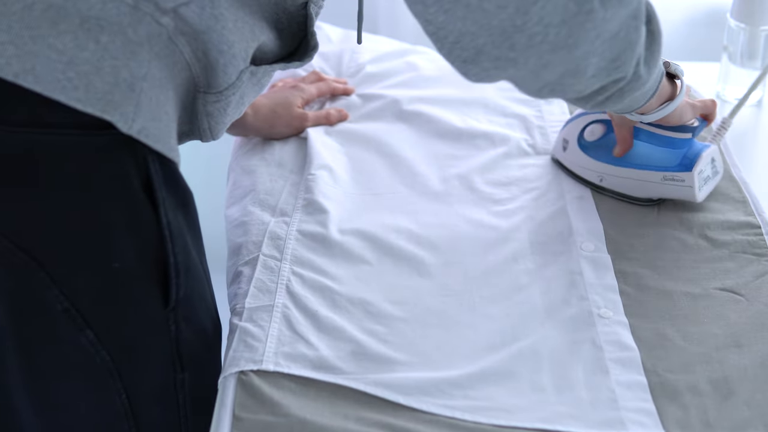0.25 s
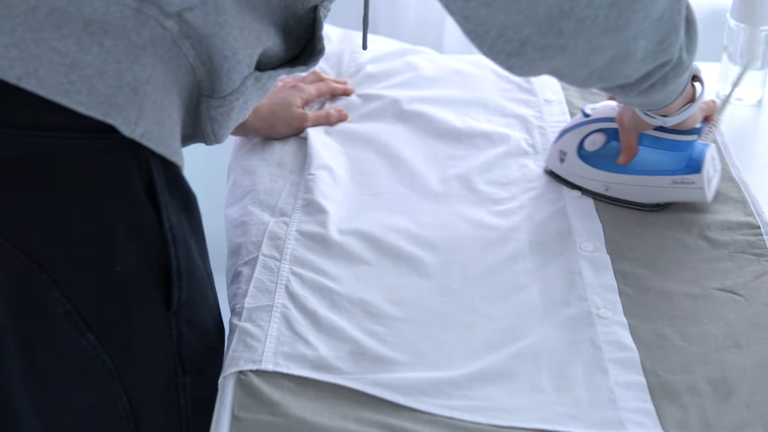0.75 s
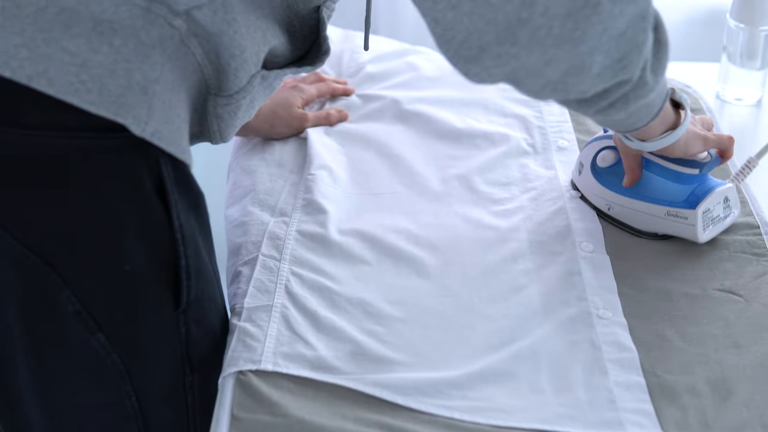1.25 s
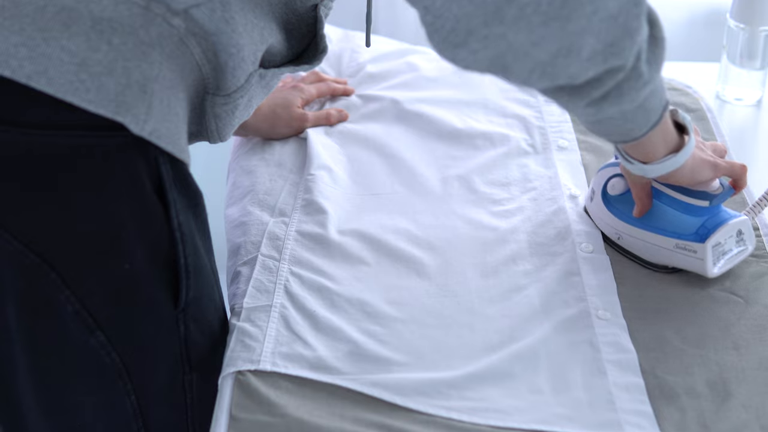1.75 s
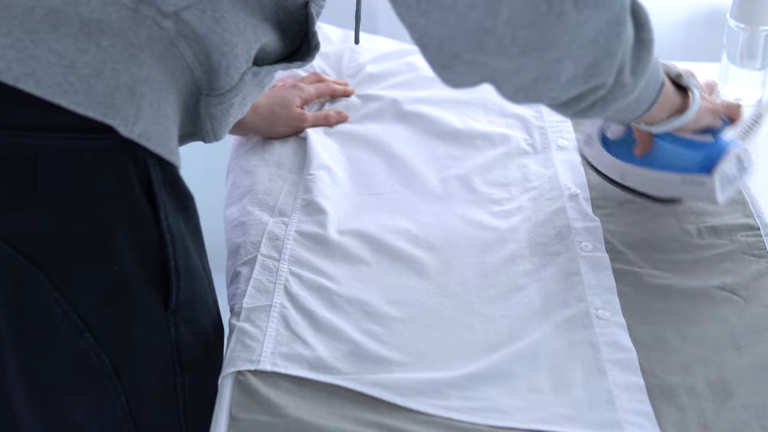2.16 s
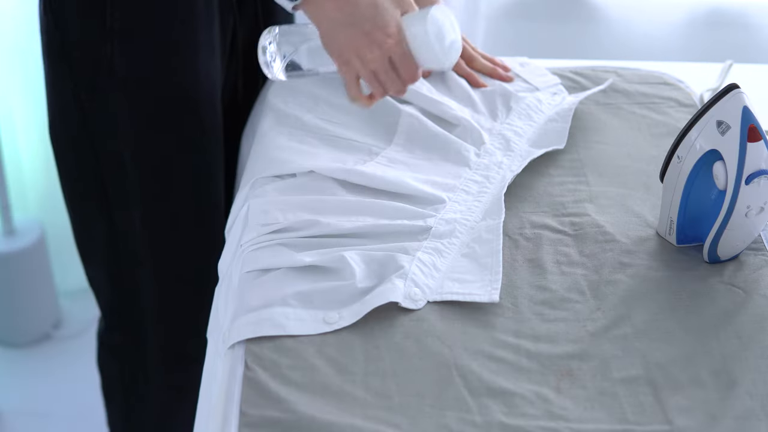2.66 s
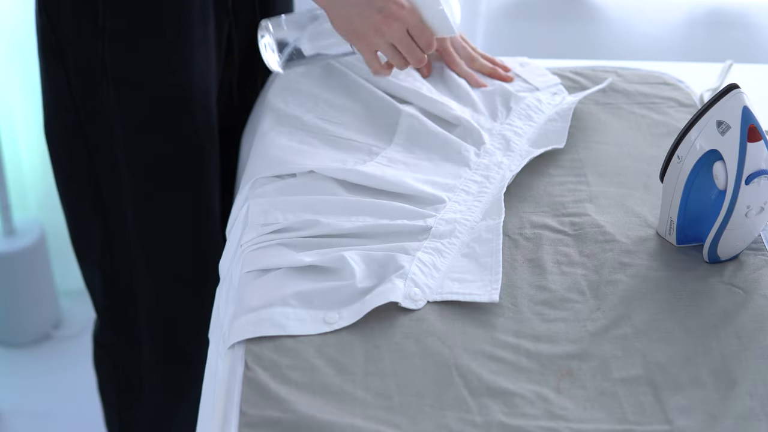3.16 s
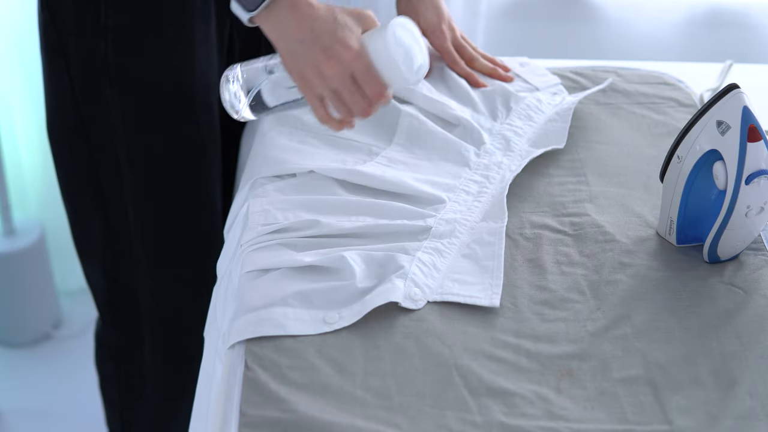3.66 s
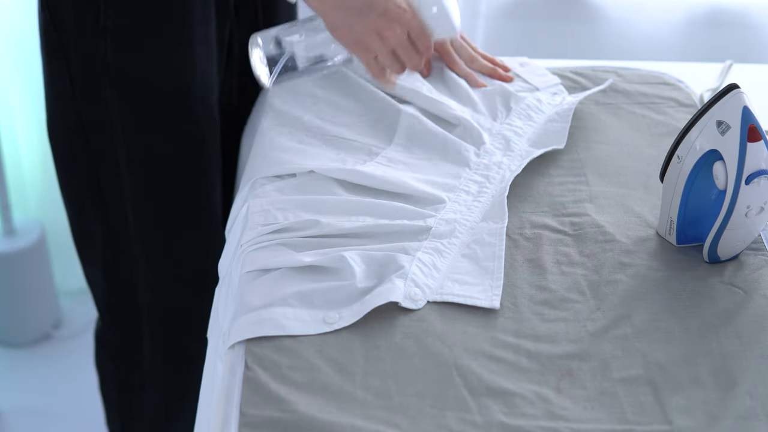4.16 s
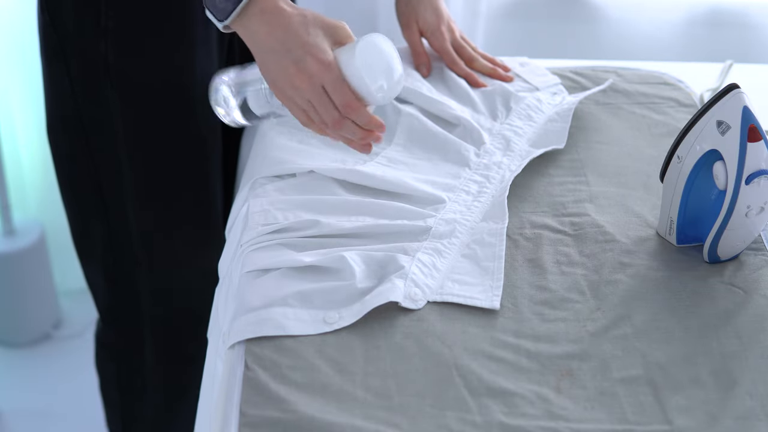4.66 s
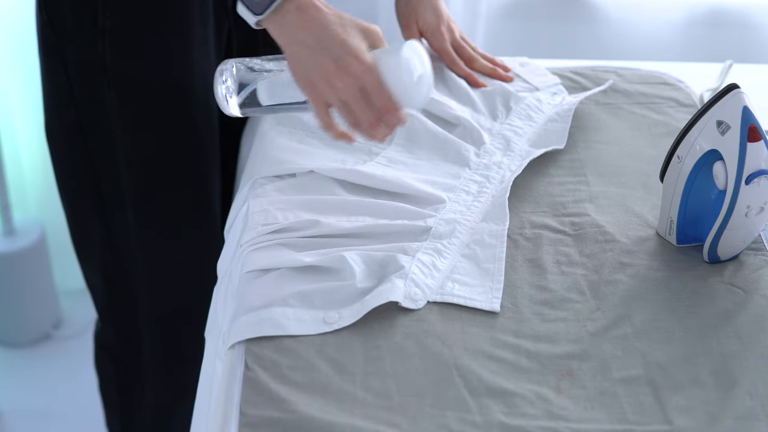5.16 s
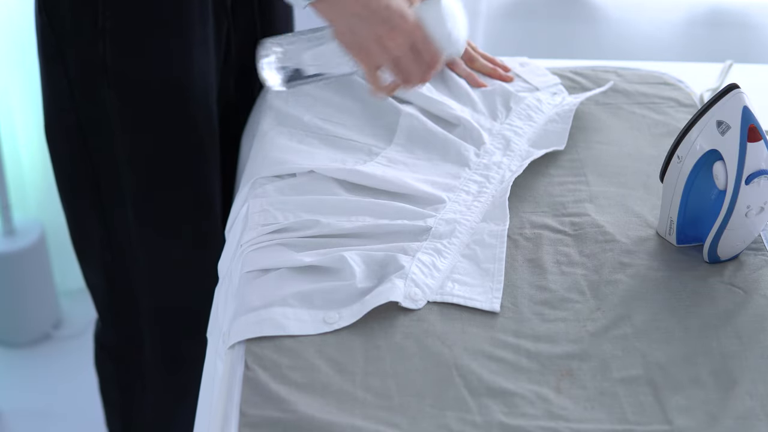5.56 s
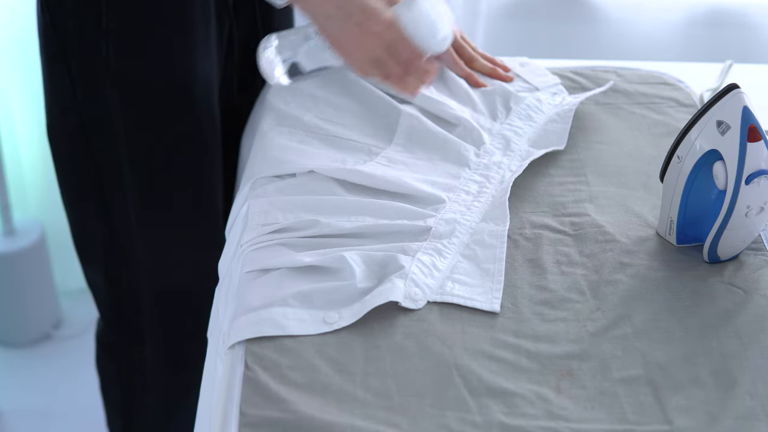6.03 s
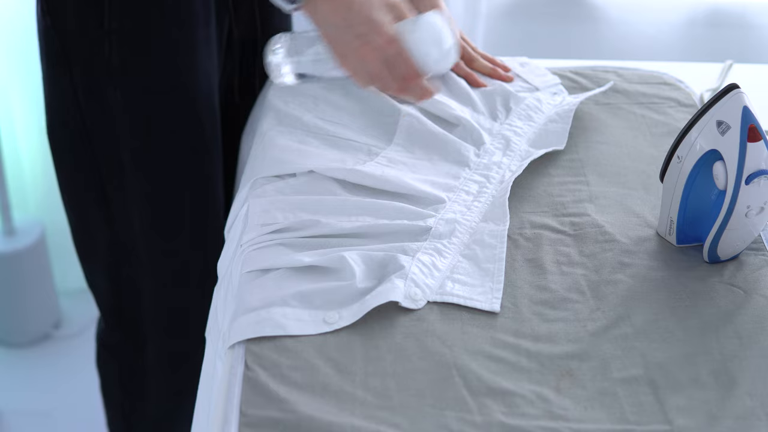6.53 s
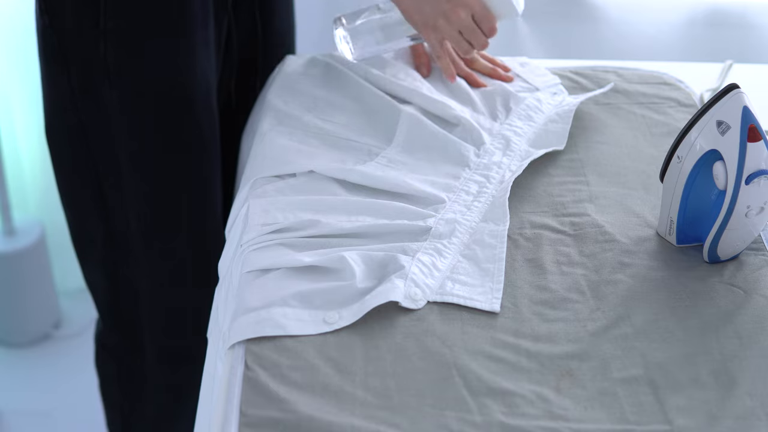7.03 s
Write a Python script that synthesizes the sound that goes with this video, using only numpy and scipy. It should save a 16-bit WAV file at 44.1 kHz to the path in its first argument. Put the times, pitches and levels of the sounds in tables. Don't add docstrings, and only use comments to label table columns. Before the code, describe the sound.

A quiet small room, heard closely in stereo, with faint far traffic and a hollow, airy drone that swells and sinks. From 0 to about 1.3 s an iron moves over cloth; water in its tank slops in quick, hollow glugs and plinks, with low thumps near 0.1 and 0.7 s, over very soft steam hiss. A calmer stretch follows, with small slops near 1.9 and 2.25 s. At 2.5 s the scene cuts abruptly to a bright mister already spraying, sagging and stopping around 3.0 s. A long, dense hiss starts sharply at 3.2 s and holds until 6.45 s, its brightness gently waving; a bottle knock and slosh come at 4.75 s. It shuts off quickly with a small slop. Another watery plop sounds at 6.9 s, then a last spray begins at 7.0 s and continues to the end.

```python
import sys
import numpy as np
from scipy import signal
from scipy.io import wavfile

SR = 44100
rng = np.random.default_rng(int(sys.argv[2]) if len(sys.argv) > 2 else 0)


def boost_factor(decibels):
    exponent = np.asarray(decibels, float) / 20
    return 10 ** exponent


def pcm_store(signal):
    levels = np.round(np.clip(np.atleast_2d(signal), -1, 1) * 32767)
    wavfile.write(sys.argv[1], SR, levels.astype(np.int16).T)


N = 321489
TIME = np.arange(N) / SR
SPRAY_SCENE_S = 2.478

# frequency in Hz, density in dB per Hz.
JET_SPECTRUM = [(710, -40), (1200, -14.5), (1880, -5), (2160, -2.5), (3580, -0.5), (3980, -1.5),
                (5200, -0.5), (13800, -1.5), (15500, -2)]
# frequency in Hz, side minus mid in dB.
JET_WIDTH = [(60, -30), (110, -26), (200, -11), (380, -9), (700, -4), (1290, -9.5), (2380, -8.5),
             (4400, -3), (8120, -4.5), (15000, -10)]
# frequency in Hz, left minus right in dB.
JET_LEAN = [(60, 0.0), (110, 0.0), (200, 0.5), (380, 1.0), (700, -8), (1290, 0.5), (2380, 0.5), (4400, 2),
            (8120, 1.5), (15000, 1)]
# valve opens in s, valve shuts in s, jet in dB, sag in dB per s,
# extra low hiss in dB.
SQUEEZES = [
    (2.201, 3.035, -38.5, 4.5, 1.3),
    (3.171, 6.455, -39.5, 0.04, -0.05),
    (7, 7.6, -40, 2.5, 1.4),
]
# time in seconds, how far the nozzle faces the listener from -1 to 1.
NOZZLE_AIM = [(2.5, -0.085), (2.65, -0.026), (3.0, -.2), (3.45, -0.7), (3.6, -.2), (3.8, 0.91), (4.15, -.7),
              (4.45, 0.69), (4.85, .1), (5.05, 0.94), (5.45, -0.73), (5.8, 1), (6.1, -.5), (6.45, -0.33),
              (7.0, -0.44), (7.29, -.4)]
# time in seconds, dip in dB, half length in s.
FINGER_SLIP = (4.91, 2.5, .025)
SNAP_S, BUILD_DB, BUILD_S = 0.0042, 5.5, 0.041
FADE_DB_PER_S, FADE_TILT, FADE_KNEE_S = 198, 0.37, 0.004
DRIBBLE_DB, DRIBBLE_DB_PER_S, DRIBBLE_DB_PER_OCTAVE = -15.5, 43, -5
AIM_DB, AIM_LOW_DB, AIM_TOP_DB = .3, 1, 2.2

# frequency in Hz, density in dB per Hz.
STEAM_SPECTRUM = [(880, -30), (1500, 0), (1740, -1), (2090, 0), (2330, 0.5), (9790, -17.5), (15500, -26)]
# time in seconds, steam in dB.
IRON_STROKE = [(0, -63.5), (.08, -67), (.26, -61.5), (.42, -65.5), (.7, -61), (1.25, -61), (1.65, -60.5),
               (1.95, -58), (2.17, -69)]
STEAM_TOP_DB, TOP_FOLLOWS = 5, -0.0094

# start in seconds, peak in dB, t60 in s, sharpness in dB, plink in dB.
WATER_SLOPS = [(0, -45, 0.32, -14, -12), (.105, -43, .08, -1, -17), (.148, -46, .45, -6, -5),
               (.165, -45, 0.27, -15, -10), (.335, -43.5, 0.42, 3, 0), (0.478, -35.5, 0.45, 0, 0),
               (.632, -40.5, .2, 2, -4), (0.645, -36.5, .24, 2.5, -3), (.66, -45, 0.16, -9, -14),
               (.675, -51, 0.46, 6.5, -12), (.70, -39.5, 0.12, -23, -13), (.756, -37.5, 0.26, -4, 3.5),
               (.91, -37.5, 0.39, 1, -8), (1.026, -40, 0.42, 1.5, -2), (1.896, -43, 0.16, -4, 3),
               (2.243, -36.5, 0.45, -13, -7), (2.327, -46, .15, -15, -11), (2.481, -40, 0.23, -2, -8),
               (4.76, -37, 0.16, -6, -8), (6.44, -42, .087, -6, -3), (6.880, -49, 0.037, 10, -8),
               (6.881, -39.5, 0.55, .5, -6)]
# frequency in Hz, width in Hz, level in dB.
TANK_MODES = [(304, 120, -1), (840, 200, -4.5), (1170, 300, -1), (1720, 570, -3), (3420, 480, -13),
              (4350, 370, -13.5), (8050, 6200, -25)]
# time in seconds, thump in dB.
END_WAVES = [
    (0, 4),
    (.105, 7.5),
    (.66, 6.5),
]
THUMP_DB = -16
PLINK_HZ, PLINK_WIDTH_HZ, PLINK_T60_S = 1890, 180, 0.12

# time in seconds, level in dB, then modes, each a frequency in Hz, level in dB, t60 in s.
BOTTLE_KNOCK = (4.758, -45, [(875, 1, .35), (830, -1, .4), (945, -5, .25), (740, 3, .08), (1600, -3, .05)])
# start in seconds, frequency in Hz, level in dB, t60 in s.
BOARD_THUDS = [(1.33, 102, -75, 1.2), (1.7, 125, -76, .6), (2.06, 135, -72, .6), (2.11, 100, -64, .5),
               (2.34, 95, -68, .6), (6.8, 205, -68, .5), (7.0, 200, -66, .8), (7.05, 140, -74, 1.2)]

# time in seconds, level in dB, hollow resonance in Hz, its share of the power from 0 to 1.
TRAFFIC = [(0, -55, 902, 0.2), (.5, -57.5, 945, 0), (1.0, -54.5, 1003, 0.14), (1.3, -58, 1030, 0.07),
           (1.72, -54, 1090, 0.28), (2.0, -49.5, 1125, 0.44), (2.29, -48.5, 1124, 0.47),
           (2.36, -54.5, 1100, 0.3), (2.47, -54.5, 1083, .2), (2.52, -50.5, 899, 0.33),
           (3.0, -51.5, 964.5, 0.47), (3.5, -53, 890, .55), (4.3, -54.5, 892.5, 0.46),
           (5.0, -55, 869, 0.41), (5.85, -57, 878, 0.47), (6.25, -60, 867, 0.31), (6.86, -61, 884, 0.18),
           (6.95, -57.5, 919, 0.41)]
# frequency in Hz, density in dB per Hz.
TRAFFIC_SPECTRUM = [(40, -31), (100, -24.5), (170, -21.5), (220, -10.5), (310, -2), (450, -2.5), (800, 1),
                    (1200, 2.5), (1700, -1), (2300, -8.5), (3200, -24)]
# frequency in Hz, side minus mid in dB.
AIR_WIDTH = [(60, -20), (110, -37), (200, -21), (380, -9.5), (700, -7), (1290, -6.5), (2380, -5.5),
             (4400, -2), (8120, -5), (15000, -7)]
HOLLOW_WIDTH_HZ = (230, 240)
RUMBLE_DB, RUMBLE_FOLLOWS = (-59.5, -63.5), (0.22, 0.15)   # level, and dB per dB of traffic
DEEP_DB = (-85, -85.5)
HISS_DB = -64.5
ROOM_T60_S, ROOM_DB = 0.19, -8.5
LOW_CUT_HZ, TOP_HZ = 45, 15720


def mister():
    facing, = in_time(NOZZLE_AIM)
    slip_s, dip_db, half_s = FINGER_SLIP
    common_db = AIM_DB * facing - dip_db * np.exp(-((TIME - slip_s) / half_s) ** 2)

    def colour(hz):
        aim_db = AIM_LOW_DB * facing + .1 if hz < 6000 else AIM_TOP_DB * facing - .4
        weight = np.interp(np.log(hz), np.log([2420, 4500, 7840, 12200]), [1, 0, 0, 1])
        return jet(hz) + common_db + weight * aim_db

    return boost_factor(4) * bands(1060, JET_SPECTRUM, JET_WIDTH, JET_LEAN, colour,
                          patchy_db=.35, flicker_db=.15, count=8)


def jet(hz):
    level = np.full(N, -120.)
    starts = [int(row[0] * SR) for row in SQUEEZES] + [N]
    for (opens, shuts, level_db, sag, low_db), i, j in zip(SQUEEZES, starts, starts[1:]):
        t = TIME[1:j - i + 1]
        after = np.maximum(TIME[i:j] - shuts, 0)
        fade = boost_factor(-FADE_DB_PER_S * (hz / 4500) ** FADE_TILT * after ** 2 / (after + FADE_KNEE_S))
        dull_db = DRIBBLE_DB_PER_OCTAVE * max(np.log2(hz / 4500), 0)
        dribble = boost_factor(DRIBBLE_DB - DRIBBLE_DB_PER_S * after + dull_db)
        held_db = level_db + low_db * (2000 < hz < 4000) - sag * t - BUILD_DB * np.exp(-t / BUILD_S)
        snap = 1 - np.exp(-t / SNAP_S)
        level[i:j] = held_db + 20 * np.log10(snap * (fade + dribble * (1 - fade)))
    return level


def sole():
    level_db, = in_time(IRON_STROKE)
    top_db = STEAM_TOP_DB + TOP_FOLLOWS * (level_db + 65)

    def colour(hz):
        return level_db + np.clip(np.log2(hz / 4500), 0, 1) * top_db

    centred = [(100, 0), (16000, 0)]
    hiss = bands(1507, STEAM_SPECTRUM, AIR_WIDTH, centred, colour, patchy_db=1.0, flicker_db=0.85, count=7)
    return boost_factor(4) * (TIME < SPRAY_SCENE_S) * hiss


def slops():
    s, peak_db, t60, sharp_db, plink_db = np.transpose(WATER_SLOPS)
    thump_db = np.full(len(s), float(THUMP_DB))
    for when, big_db in END_WAVES:
        thump_db[np.argmin(abs(s - when))] = big_db
    plink = burst(peak_db + plink_db - 7.5, np.full(len(s), PLINK_T60_S), rise_s=0.00098)
    out = plink * splashes(PLINK_HZ, PLINK_WIDTH_HZ)
    for hz, width_hz, mode_db in TANK_MODES:
        colour_db = thump_db if hz < 500 else sharp_db * np.log2(hz / 1200)
        mode_t60 = t60 * (1200 / hz) ** 0.36
        shape = burst(peak_db + colour_db + mode_db - 11.5, mode_t60, rise_s=3000.0 / hz ** 2)
        out = out + shape * splashes(hz, 2.2 * width_hz)
    return out


def burst(levels_db, t60s, rise_s):
    shape = np.zeros(N)
    for (s, *_), level_db, t60 in zip(WATER_SLOPS, levels_db, t60s):
        i = int(s * SR)
        t = TIME[:min(SR // 2, N - i)]
        shape[i:i + len(t)] += boost_factor(level_db - 60 * t / t60) * (1 - np.exp(-t / rise_s))
    return shape


def splashes(hz, width_hz):
    lump_gain = boost_factor(2.5 * rng.standard_normal(N // 88 + 1).repeat(88)[:N])
    lumps = rng.standard_normal((2, N)) * lump_gain
    once = resonance(lumps, hz, width_hz)
    mid, side = rms_one(resonance(once, hz, width_hz))
    return stereo(-10.5, .6, mid, side)


def knock():
    s, level_db, modes = BOTTLE_KNOCK
    t = np.maximum(TIME - s, 0)
    rings = sum(boost_factor(db - 60 * t / t60) * np.sin(2 * np.pi * hz * t) for hz, db, t60 in modes)
    return boost_factor(level_db) * (1 - np.exp(-t / 0.002)) * rings


def thud():
    out = np.zeros(N)
    for s, hz, level_db, t60 in BOARD_THUDS:
        i = int(s * SR)
        t = TIME[:min(SR, N - i)]
        swell = 1 - np.exp(-t / 0.03)
        out[i:i + SR] += boost_factor(level_db - 60 * t / t60) * swell * np.sin(2 * np.pi * hz * t)
    return out


def drone():
    middle_db, hollow_hz, share = in_time(TRAFFIC)
    ironing = TIME < SPRAY_SCENE_S
    width_hz = np.where(ironing, *HOLLOW_WIDTH_HZ)
    rumble_db = np.where(ironing, *RUMBLE_DB) + np.where(ironing, *RUMBLE_FOLLOWS) * (middle_db + 58.5)
    deep_db = np.where(ironing, *DEEP_DB)
    share = np.clip(share, .01, .95)
    broad_db = middle_db + 10 * np.log10(1 - share)

    def colour(hz):
        if hz < 180:
            return deep_db + 27.5
        return rumble_db if hz < 600 else broad_db - 5.0

    lean = [(100, 0.62), (16000, 0.56)]
    rumble = boost_factor(9) * bands(45.36, TRAFFIC_SPECTRUM, AIR_WIDTH, lean, colour,
                            patchy_db=1.1, flicker_db=0.6, count=12)
    steps = np.cumsum(width_hz) / SR
    knots = rng.standard_normal((2, 2, 4000))
    slow = [[np.interp(steps, np.arange(4000), k) for k in pair] for pair in knots]
    phase = 2 * np.pi * np.cumsum(hollow_hz) / SR
    mid, side = slow[0] * np.cos(phase) + slow[1] * np.sin(phase)
    hollow = boost_factor(middle_db + 2.0) * np.sqrt(share) * stereo(-10.5, .5, mid, side)
    return rumble + hollow


def microphone_hiss():
    return boost_factor(HISS_DB) * signal.lfilter([1, -.85, -.15], [1, -.85], rng.standard_normal((2, N)))


def room(x, moves_per_s):
    t = TIME[:SR // 3]
    clouds = rng.standard_normal((4, len(t))) * boost_factor(-60 * t / ROOM_T60_S) * (t > .002)
    shares = np.array([drift(moves_per_s) for cloud in clouds])
    shares /= np.linalg.norm(shares, axis=0)
    echoes = 0
    for share, cloud in zip(shares, clouds):
        reflection = cloud[None] / np.linalg.norm(cloud)
        echoes = echoes + share * signal.fftconvolve(x, reflection, axes=1)[:, :N]
    return (x + boost_factor(ROOM_DB) * echoes) / np.sqrt(1 + boost_factor(2 * ROOM_DB))


def bands(low_hz, spectrum, sides, pans, change_db, patchy_db, flicker_db, count):
    out, gust = 0, drift(7.6)
    edges = low_hz * 2 ** (np.arange(count + 1) / 2)
    white = rng.standard_normal((2, 2, N))
    hz = np.sqrt(edges[1:] * edges[:-1])
    level = at_hz(spectrum, hz)
    level -= 10 * np.log10(np.sum(boost_factor(2 * level) * np.diff(edges)) / (SR / 2))
    for k in range(count):
        band = signal.butter(2, edges[k:k + 2], "band", fs=SR, output="sos")
        mid, side = signal.sosfilt(band, white[k % 2])
        gain = boost_factor(level[k] + change_db(hz[k]) + patchy_db * drift(1.37) + flicker_db * gust)
        out = out + gain * stereo(at_hz(sides, hz[k]), at_hz(pans, hz[k]), mid, side)
    return out


def resonance(x, hz, width_hz):
    r = np.exp(-np.pi * width_hz / SR)
    poles = [1, -2 * r * np.cos(2 * np.pi * hz / SR), r * r]
    return signal.lfilter(np.array([1, 0, -1]) * (1 - r * r) / 2, poles, x)


def stereo(side_db, pan_db, mid, side):
    return (mid + boost_factor(side_db) * side * [[1], [-1]]) * boost_factor(pan_db * np.array([[.5], [-.5]]))


def drift(rate):
    r = np.exp(-80 * np.pi * rate / SR)
    slow = signal.lfilter([1], [1, -2 * r, r * r], rng.standard_normal(N // 40 + 2002))[2000:]
    return np.interp(np.arange(N) / 40, np.arange(len(slow)), rms_one(slow))


def rms_one(x):
    return x / np.sqrt(np.mean(x ** 2) + 1e-20)


def at_hz(points, hz):
    table_hz, db = np.transpose(points)
    return np.interp(np.log(hz), np.log(table_hz), db)


def in_time(rows):
    s, *columns = np.transpose(rows)
    return [np.interp(TIME, s, c) for c in columns]


def scene():
    spray = room(mister(), moves_per_s=0.77) * (TIME >= SPRAY_SCENE_S)
    ironing_and_traffic = room(drone() + sole(), moves_per_s=1.78)
    return spray + ironing_and_traffic + knock() + slops() + thud() + microphone_hiss()


def low_pass(x):
    return signal.sosfilt(signal.butter(12, 17000, fs=SR, output="sos"), x)


def record(dry):
    low_cut = signal.butter(2, LOW_CUT_HZ, "high", fs=SR, output="sos")
    top_cut = signal.ellip(12, .3, 70, TOP_HZ, fs=SR, output="sos")
    mix = signal.sosfilt(np.vstack([low_cut, top_cut]), dry)
    return low_pass(mix)


dry = scene()
out = record(dry)
pcm_store(out)
```